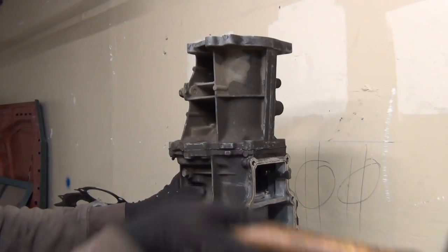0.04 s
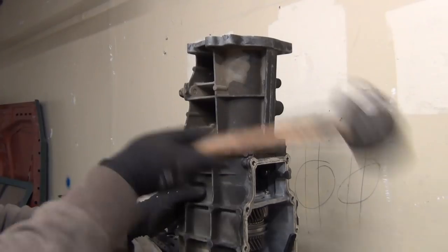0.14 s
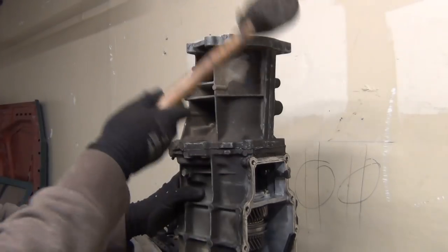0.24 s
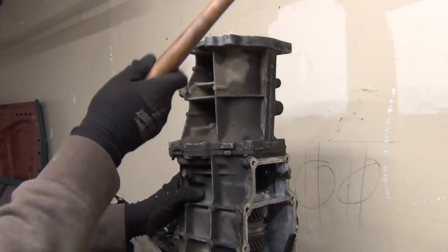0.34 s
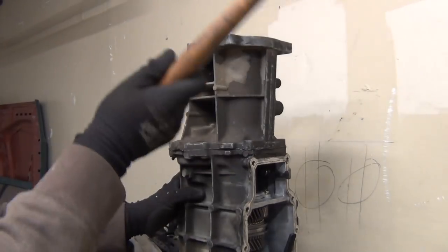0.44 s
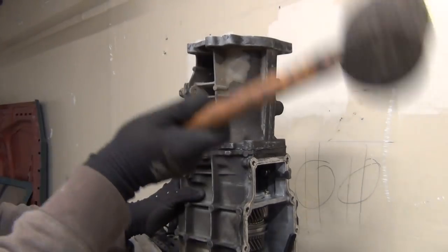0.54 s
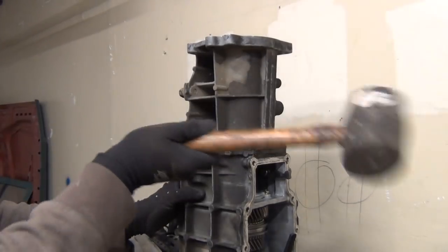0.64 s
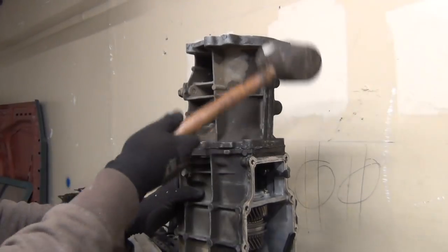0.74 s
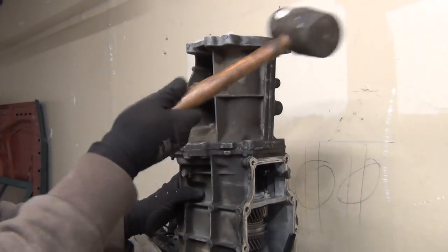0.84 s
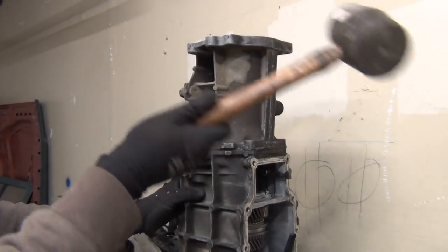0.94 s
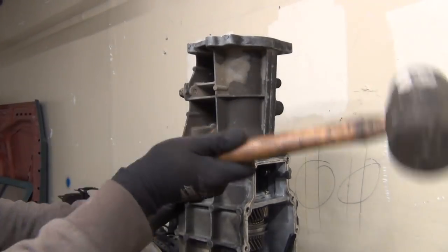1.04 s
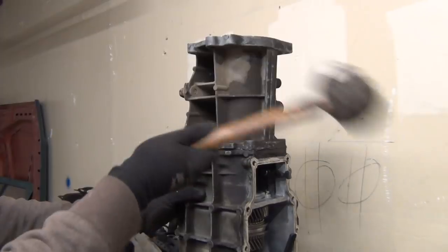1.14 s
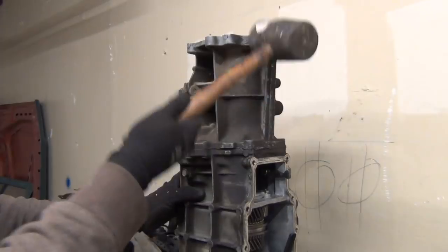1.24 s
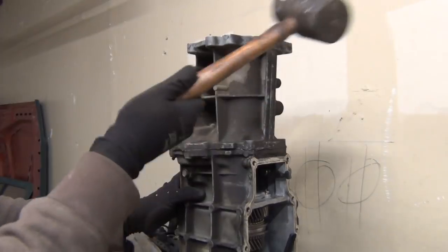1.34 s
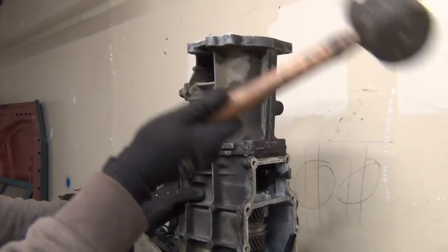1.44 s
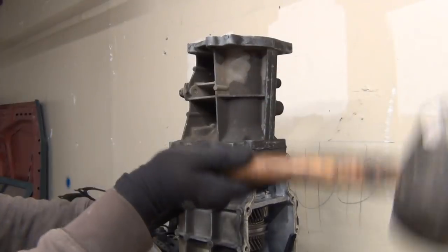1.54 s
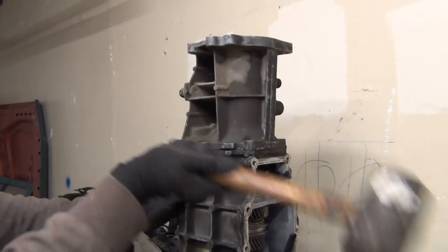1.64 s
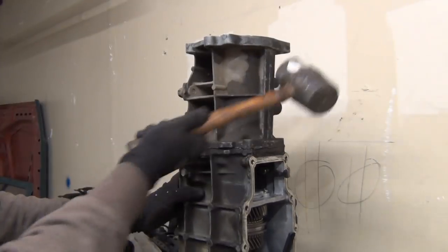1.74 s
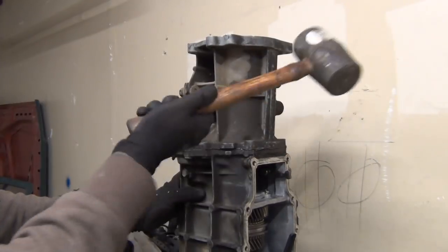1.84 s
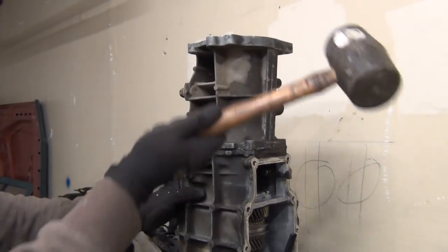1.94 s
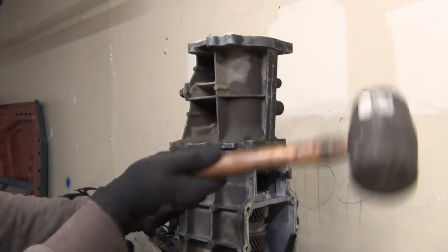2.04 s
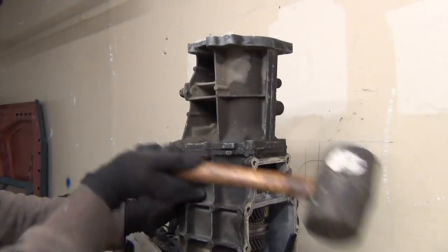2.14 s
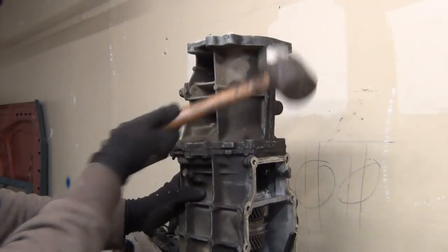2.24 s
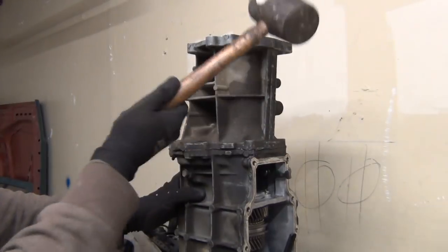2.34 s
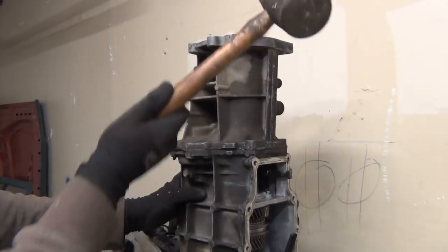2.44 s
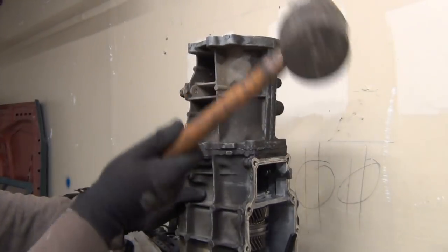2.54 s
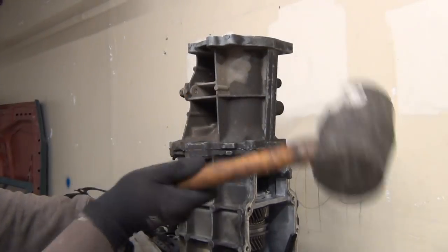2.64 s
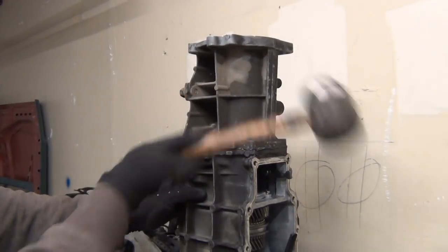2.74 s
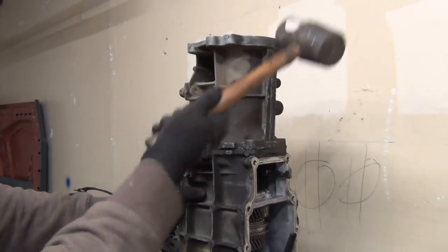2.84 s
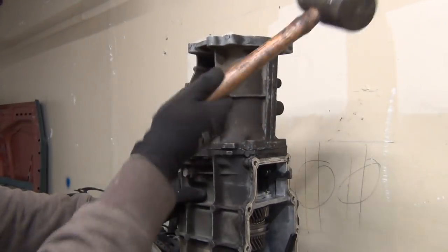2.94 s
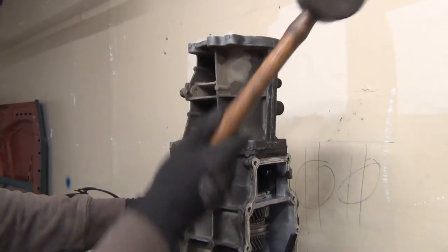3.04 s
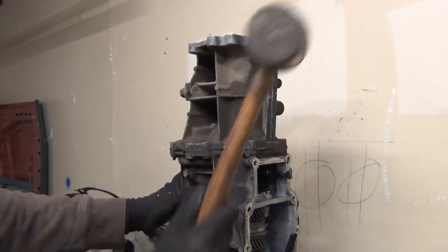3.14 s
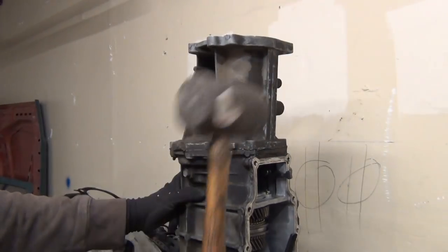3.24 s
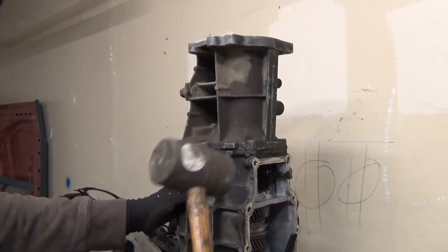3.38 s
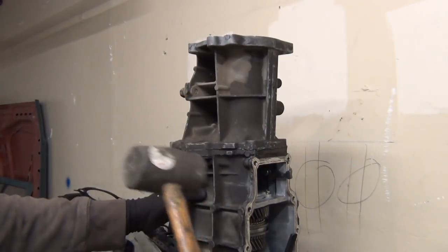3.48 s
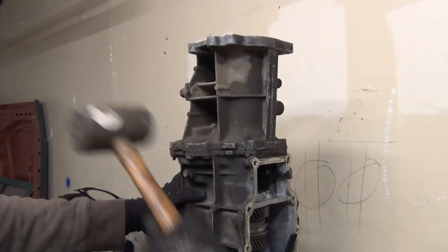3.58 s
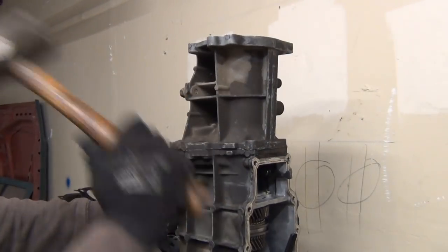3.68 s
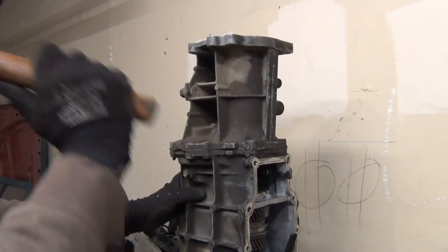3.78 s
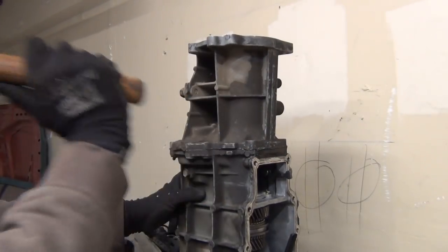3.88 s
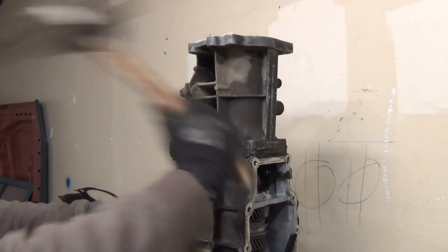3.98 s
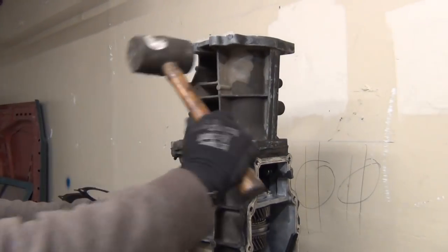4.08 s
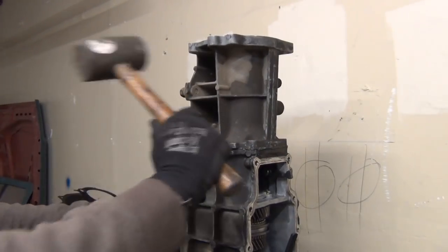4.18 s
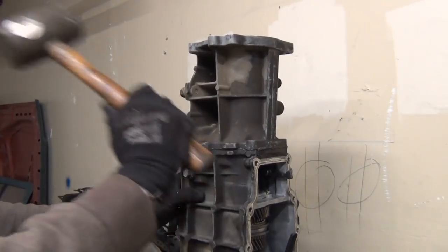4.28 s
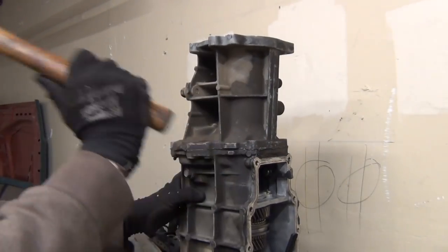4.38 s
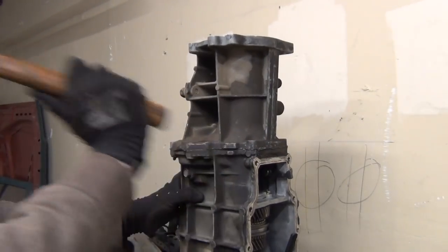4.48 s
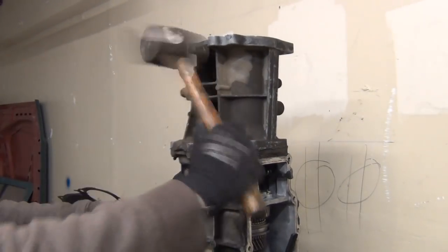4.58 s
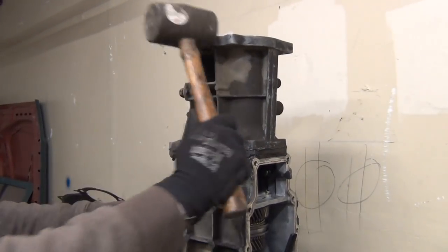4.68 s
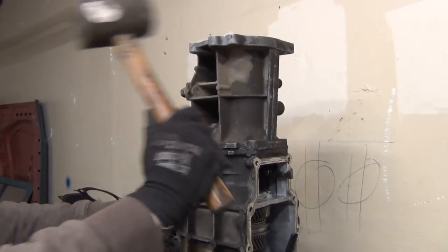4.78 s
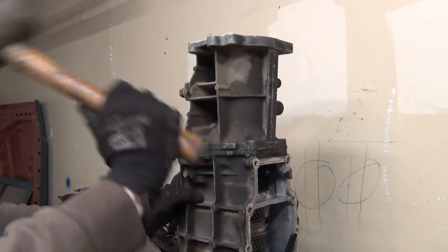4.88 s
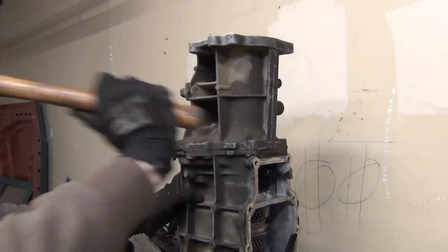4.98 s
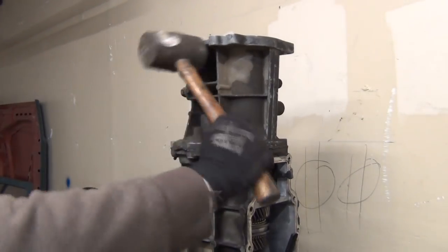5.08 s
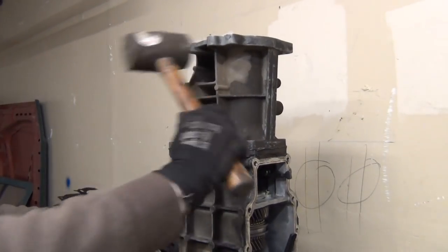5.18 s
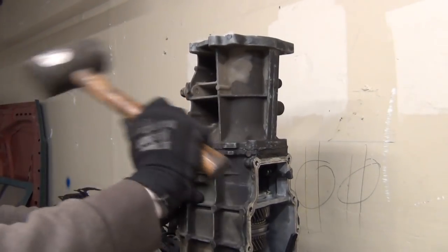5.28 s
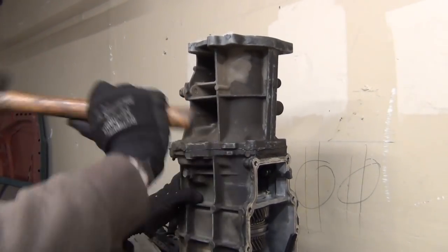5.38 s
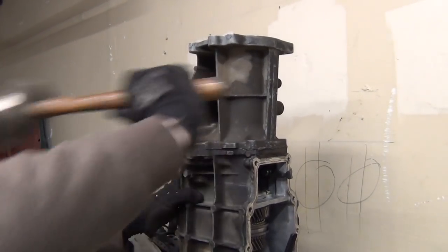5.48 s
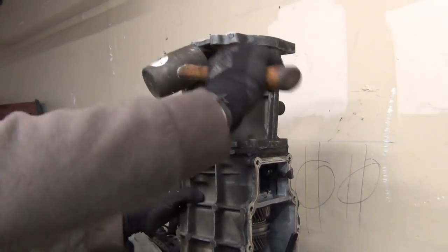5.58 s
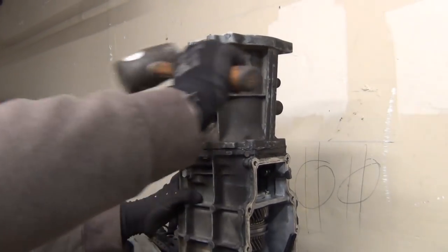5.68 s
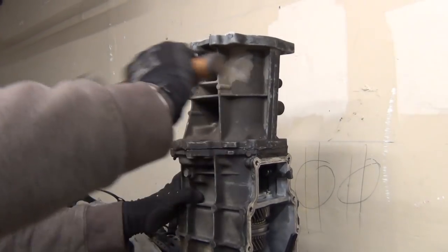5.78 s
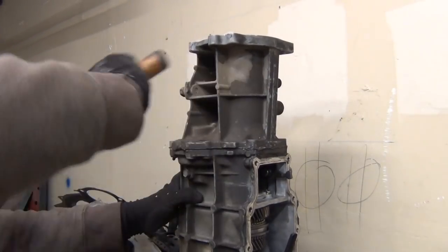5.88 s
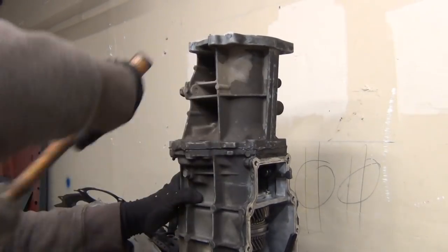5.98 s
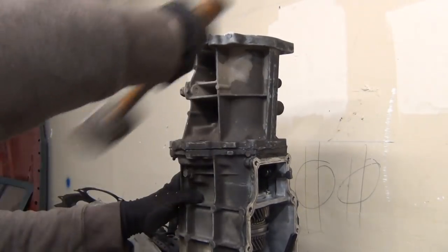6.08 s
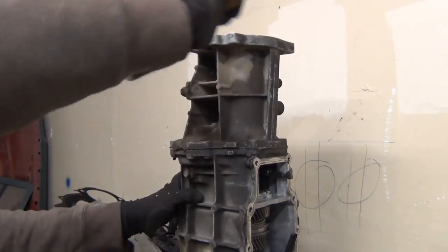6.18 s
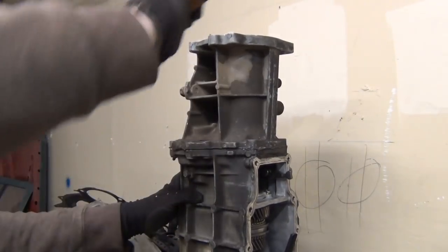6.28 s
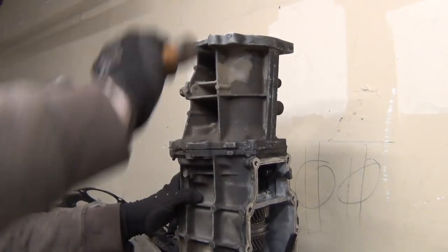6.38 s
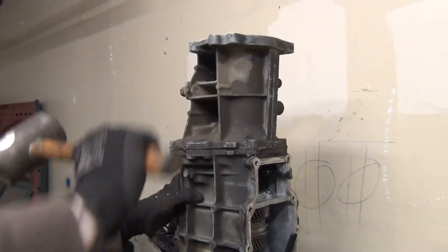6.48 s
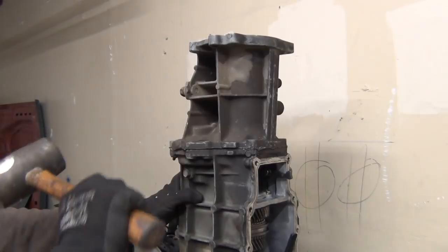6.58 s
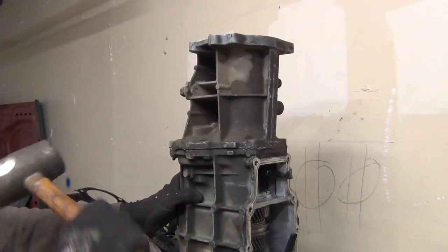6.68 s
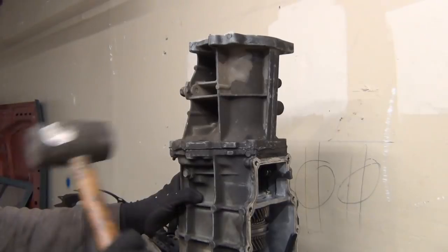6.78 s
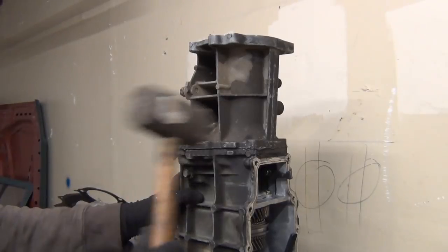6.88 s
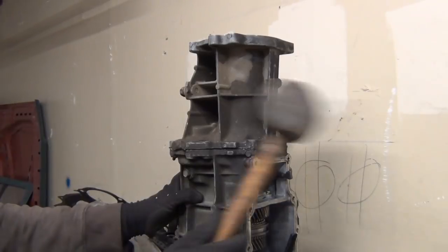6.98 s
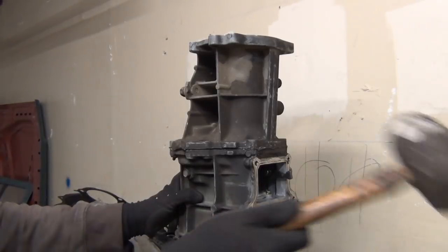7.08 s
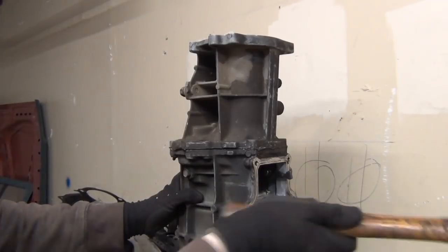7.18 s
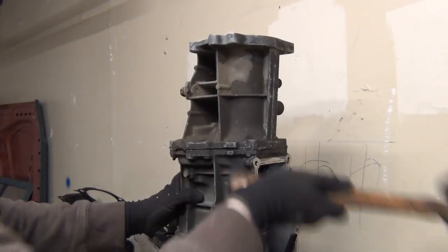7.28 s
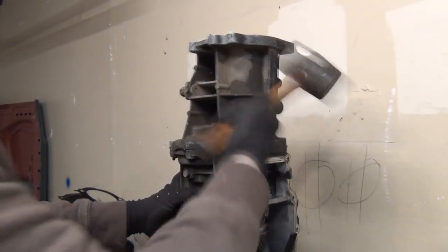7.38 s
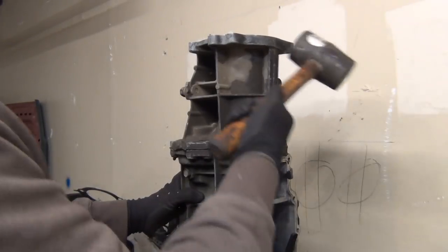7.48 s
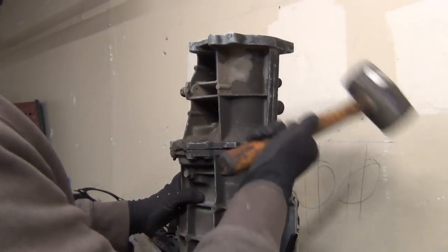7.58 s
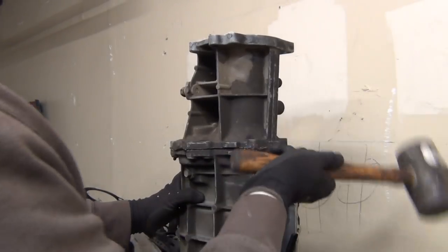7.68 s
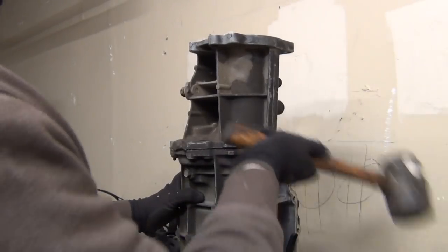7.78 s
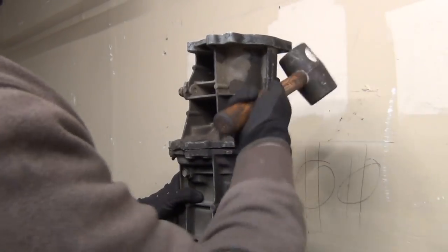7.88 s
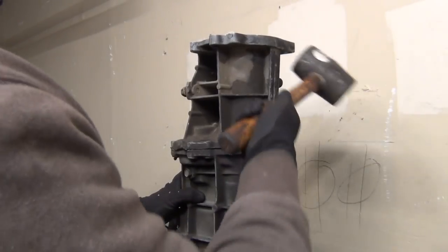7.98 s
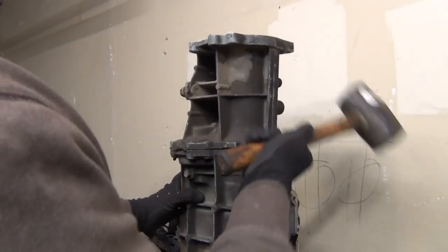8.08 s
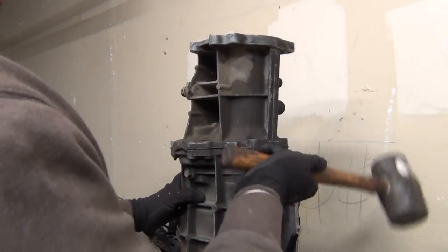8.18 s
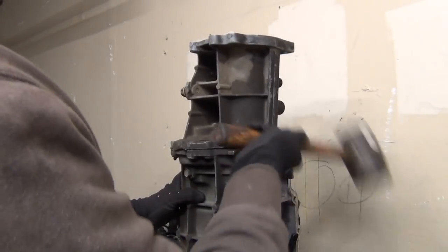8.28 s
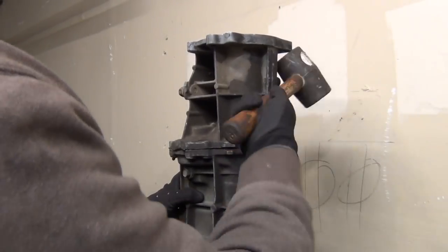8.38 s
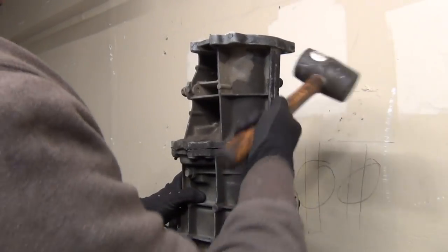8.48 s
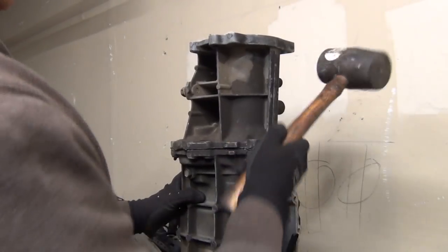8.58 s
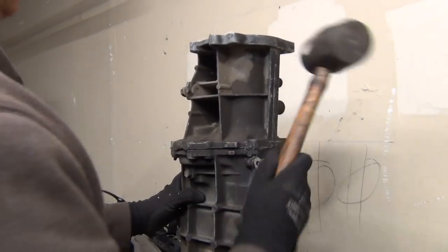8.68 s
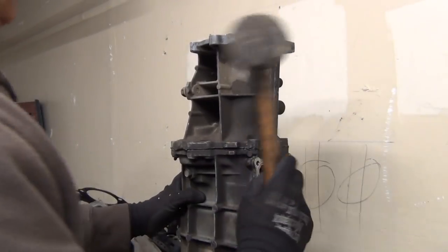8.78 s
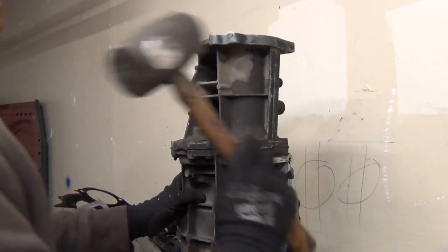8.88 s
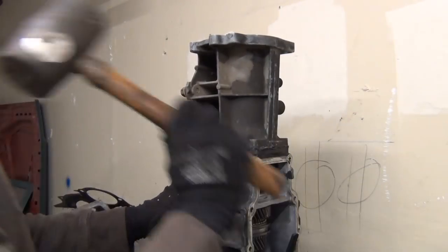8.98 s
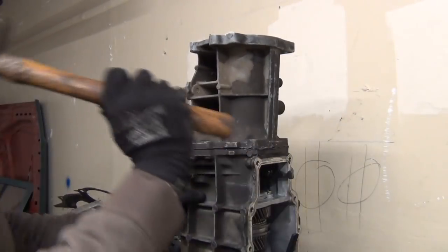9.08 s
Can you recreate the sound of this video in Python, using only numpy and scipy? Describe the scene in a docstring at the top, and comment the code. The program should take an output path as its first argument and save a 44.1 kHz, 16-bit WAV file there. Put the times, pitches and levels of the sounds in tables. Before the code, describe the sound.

A rubber mallet strikes a heavy cast metal housing on a bench, six evenly spaced blows, a pause with soft glove rustle, five more ending with a weaker hit, another pause, then three final blows. Each is a dull hollow thunk with a short damped clang. Loose parts tick and the housing rocks faintly. Close microphone, small live garage, quiet air.

```python
"""Mallet on a metal housing

A rubber mallet lands fourteen blows on six spots of a cast metal housing on a bench in a garage.
Each blow is coloured noise with a bright snap, over decaying sines for the casting and the bench.
Softer copies rock the housing, filtered bursts tick, and swelling noise makes rustle, shuffle and air.
A quick limiter in the camera microphone flattens the peaks; its electronics add a whine of steady sines.
"""
import sys
import numpy as np
from scipy import signal
from scipy.fft import rfft, irfft
from scipy.io import wavfile
from scipy.ndimage import uniform_filter1d, minimum_filter1d

SR = 44100
rng = np.random.default_rng(int(sys.argv[2]) if len(sys.argv) > 2 else 0)


def to_wav(s):
    """Save 16-bit WAV."""
    ch = np.atleast_2d(s).T  # columns
    pcm = np.round(np.clip(ch, -1, 1) * 32767)  # PCM
    wavfile.write(sys.argv[1], SR, pcm.astype(np.int16))


N = 402633

# when the mallet moves to another spot on the housing: (time [s])
MOVE_TIMES = [1.5, 3.5, 4.9, 6.0, 7.0]


def spot_at(s):
    """Number of the spot being struck at time s, counted by the moves so far."""
    return np.searchsorted(MOVE_TIMES, s)


# mallet blows: (time [s], strength [dB], left minus right [dB], rise [s], hardness [dB/octave], snap [dB],
# bench thump [dB], casting ring [dB], pitch of the clang that stands out [Hz], clang [dB])
BLOWS = [(0.264, -10.5, 0.3, 0.0065, -0.5, -5.5, -7.5, -8, 1960, 1),
         (0.782, -10.5, 0.4, .004, -0.5, -9.5, -3, 1, 3100, 2),
         (1.2542, -9.5, 0.3, 0.0031, -0.5, -11.5, -8, -1.5, 3220, 5),
         (1.799, -11, 0.5, 0.0078, 0.56, -0.5, -2, -2, 3090, 7),
         (2.306, -12.5, 0.3, .004, -0.5, -7.5, -6.5, -2, 3180, 2.5),
         (2.854, -8.5, .3, 0.0027, 0, -18, -11, -2, 3100, 4),
         (4.084, -9, 0.3, 0.026, 0.5, -21.5, -10.5, 2.5, 1014, 0.5),
         (4.657, -9.5, -0.1, 0.0062, 1, -3, -9.5, 2, 3170, 5),
         (5.153, -10, 0.6, 0.0029, 0.5, -7, -12.5, -4, 3680, 1),
         (5.631, -13.5, 0, 0.0071, 1, -3, -30.5, 2.5, 3820, 5),
         (6.195, -19.5, 0.3, 0.0025, -1.5, -21, -8, 3, 6200, 7.5),
         (7.464, -10.5, 1, 0.0021, 0.5, -6.5, -5.5, -1, 2350, -1),
         (7.946, -10, 0.2, 0.0067, 0.5, -0.5, -6, -7.5, 2070, 6.5),
         (8.42, -13.5, 0.2, 0.0037, 2, -1, -4.5, 1, 2420, 5)]
# how strongly each spot sets the casting ringing, one list a spot: (pitch [Hz], level [dB])
SPOT_RINGS = [
    [(300, -3.5), (460, -6.5), (1000, 2), (2100, -3.5), (3100, 3.5), (3700, -5), (6300, -7.5)],
    [(300, -7.5), (460, -4.5), (1000, -3.5), (2100, -5), (3100, 2), (3700, -2), (6300, -1)],
    [(300, -2), (460, -8.5), (1000, -1.5), (2100, 0), (3100, -6.5), (3700, -18.5), (6300, -9)],
    [(300, 0), (460, -10), (1000, -11.5), (2100, -5), (3100, 2), (3700, -3), (6300, 3.5)],
    [(300, -7), (460, -7.5), (1000, -7), (2100, -10), (3100, 6), (3700, -10), (6300, -2)],
    [(300, -6), (460, -5.5), (1000, -6), (2100, -0.5), (3100, -13), (3700, -4), (6300, -8)],
]


def mallet():
    """The main blows: each excites the casting modes as strongly as its spot allows."""
    blows = []
    for s, db, pan_db, *how in BLOWS:
        side_db = .5 * pan_db * np.array([[1], [-1]])
        blows.append((s, gain_of(db + side_db) * impact(s, *how, SPOT_RINGS[spot_at(s)])))
    return sum_at(blows)


def impact(s, rise_s, hardness, snap_db, thump_db, ring_db, clang_hz, clang_db, weights):
    """One contact: clatter, snap and the ring of casting and bench, shaped by a rise and a wobble."""
    t = np.arange(SR) / SR
    room = echoes(build_s=0.0007) * np.clip(4 - 4 * t, 0, 1)  # fades out over the last quarter second

    def clang(f):
        """Close modes under the mallet ring harder."""
        width_hz = 164
        return clang_db * np.exp(-((f - clang_hz) / width_hz) ** 2)

    modes = ring(CASTING, lambda f: ring_db + clang(f) + read(weights, f), spread_db=1.5, detune=0.0047)
    modes += ring(BENCH, lambda f: thump_db, spread_db=3.0, detune=0.013)
    modes_in_room = signal.fftconvolve(room, modes[None], axes=1)[:, :SR]
    out = clatter(spot_at(s), room, hardness, clang) + snap(snap_db) + gain_of(-43.5) * modes_in_room
    add(out, 0, gain_of(-1.5) * modes)

    # the bass blooms more slowly than the rest
    bass = signal.sosfilt(signal.butter(N=1, Wn=358, fs=SR, output="sos"), out)
    out = out - bass * np.exp(-t / 0.012)
    # the housing shakes on the bench
    wobble_db = 1.7 * wander(SR, grain=0.027 * SR) * np.minimum(t / 0.32, 1)
    rise = np.minimum(t / max(rise_s, .001), 1) ** 0.79
    return out * gain_of(wobble_db) * rise


# colour of a blow, one list a spot: (pitch [Hz], relative level [dB])
FACES = [
    [(29, -31), (50, -24), (80, -27.5), (160, -17), (197, -13.5), (322, -9.5), (467, -3.5), (524, -8.5),
     (835, -20), (1210, -17), (1840, -21.5), (8160, -45.5), (13000, -56.5)],
    [(29, -26.5), (50, -25.5), (156, -9), (232, -8.5), (286, 0), (361, -3.5), (425, -4), (693, -15),
     (960, -13), (1390, -20), (2600, -27.5), (3000, -29), (4060, -36), (13000, -54.5)],
    [(29, -45), (50, -37.5), (85, -3), (168, -8.5), (193, -8.5), (249, -4), (397, -4), (467, -4),
     (512, -6.5), (875, -11), (1760, -19.5), (3140, -27), (13000, -50.5)],
    [(29, -51.5), (50, -22), (232, -11.5), (293, 1.5), (337, -6.5), (456, -9), (562, -14), (895, -20),
     (2800, -33.5), (3620, -36.5), (4360, -44.5), (6320, -46), (13000, -62)],
    [(29, -49), (50, -23), (85, -18.5), (188, -18.5), (267, -10.5), (353, -13), (456, -6), (524, -14.5),
     (617, -14), (816, -24), (895, -14.5), (3620, -28), (13000, -51)],
    [(29, -54), (50, -17), (76, -19), (300, 2.5), (378, -5.5), (467, 0), (537, -7), (662, -12),
     (1080, -18.5), (1880, -21.5), (2800, -28), (3450, -29), (13000, -50)],
]


def clatter(spot, room, hardness, clang):
    """Dull dense noise in the colour of the struck face; countless small modes make it uneven."""
    def colour_db(f):
        uneven_db = 1.9 * np.clip(f / 1500, 0, 1) * wander(len(f), grain=61)
        tilt_db = hardness * np.log2((f + 1) / 500)
        return read(FACES[spot], f) + clang(f) + tilt_db + uneven_db

    lead = np.zeros((2, 2048))  # room for the filter to settle
    sound = coloured(np.hstack([lead, room]), colour_db)[:, 2048:]
    return sound / np.sqrt(np.mean(sound[:, :SR // 20] ** 2))  # rms 1 over the first 50 ms


def snap(db):
    """The bright crack of contact: noise around 2.5 kHz that falls 60 dB in 24 ms."""
    t = np.arange(SR) / SR
    return gain_of(db - 60 * t / 0.024) * noise(SR, lambda f: -4. * abs(np.log2((f + 1) / 2500)), SAME)


# modes of the casting, decay capped in ring(): (pitch [Hz], level [dB], 60 dB decay [s])
CASTING = [(297, -2, .18), (303.5, 0.5, 0.15), (343, 1, 0.22), (344.6, -10, 0.12), (467.4, -12.5, 0.26),
           (462.2, 6.5, 0.45), (485.6, 3.5, 0.074), (648, -15, 0.21), (638.3, -4, 0.28), (770, -3.5, 0.11),
           (928, -5, 0.14), (1169, -14, 0.4), (1260, -9.5, 0.17), (1480, -11.5, 0.2), (1867, -11.5, 0.22),
           (2040, -24, 0.23), (2366, -27.5, 0.26), (2490, -16.5, .14), (2945, -20.5, 0.17),
           (3244, -25, 0.227), (3520, -19.5, .18), (3670, -18, 0.18), (4450, -41.5, 0.081),
           (4600, -26, 0.29), (5000, -48, 0.16), (5350, -31, .15), (6305, -28.5, 0.25)]
# modes of the bench, decay capped in ring(): (pitch [Hz], level [dB], 60 dB decay [s])
BENCH = [(93.9, -3, 0.49), (143, -19.5, 0.075), (155.5, 15, 0.11), (213.4, -2.5, 0.17)]


def ring(modes, colour_db, spread_db, detune):
    """Decaying sines; each blow lands a little elsewhere, so levels and pitches vary by chance."""
    hz, db, t60 = np.transpose(modes)[..., None]
    t60 = np.minimum(t60, .3)  # gasket and gloves damp every ring
    level_chance, pitch_chance = rng.standard_normal((2, len(modes), 1))
    t = np.arange(SR // 2) / SR
    level_db = db + colour_db(hz) + spread_db * level_chance - 60 * t / t60
    sines = np.sin(2 * np.pi * hz * (1 + detune * pitch_chance) * t)
    return (gain_of(level_db) * sines).sum(0)


# decay of the garage: (pitch [Hz], 60 dB decay [s])
GARAGE = [(60, 0.62), (160, 0.54), (420, 0.49), (650, 0.52), (1100, 0.55), (2200, 0.52), (3700, 0.51),
          (4300, 0.42), (7700, 0.46), (15000, 0.24)]
# likeness of left and right: (pitch [Hz], likeness [0 to 1])
SAME = [(30, .5), (60, .93), (200, .99), (330, .995), (550, .94), (1000, .96), (2000, .96), (4000, .9),
        (8000, .86), (12000, .99)]


def echoes(build_s):
    """Dense garage reflections: noise of rms 1 that builds up quickly, each band dying at its own speed."""
    hz, t, bands = signal.stft(noise(SR, lambda f: 0 * f, SAME), SR, nperseg=256)
    decay = gain_of(-60 * t / read(GARAGE, hz)[:, None])
    tail = signal.istft(bands * decay, SR, nperseg=256)[1][:, :SR]
    return tail * (1 - np.exp(-np.arange(SR) / SR / build_s))


# the housing rocks back on the bench: (time [s], level [dB], hardness [dB/octave])
KNOCKS = [(0.232, -45, 1), (0.529, -58, -12), (1.001, -46.5, 1), (1.495, -55.5, 2.5), (2.099, -50, -0.5),
          (2.5, -40, -0.5), (2.737, -49.5, -4), (4.279, -44, -16), (4.453, -44.5, -2.5), (4.879, -49, 2.5),
          (5.056, -43.5, -0.5), (5.367, -29, -12.5), (5.429, -44.5, 2.5), (5.579, -46, 1),
          (5.817, -39, -13), (5.891, -46.5, 2.5), (6.054, -47.5, -5), (6.516, -45.5, -4.5),
          (6.599, -49.5, -3.5), (6.757, -52, -5), (7.066, -53, 1), (7.674, -31, 1), (8.642, -32.5, -2),
          (8.92, -52, -6), (8.987, -49, -6)]
# how strongly rocking sets the casting ringing: (pitch [Hz], level [dB])
ROCKING_RING = [(300, -23.5), (460, -20.5), (1000, -30.5), (2100, -9.5), (3100, -16), (3700, -24),
                (6300, -13.5)]


def rocking():
    """Soft knocks excite the same casting and bench, but damped: they die sooner."""
    damping = gain_of(-60 * np.arange(SR) / SR / 1.8)
    knocks = []
    for s, db, hardness in KNOCKS:
        knock = impact(s, rise_s=.003, hardness=hardness, snap_db=-21, thump_db=-11.5, ring_db=0,
                       clang_hz=0, clang_db=0, weights=ROCKING_RING)
        knocks.append((s, gain_of(db) * damping * knock))
    return sum_at(knocks)


# loose parts tick, and at 6.21 s the mallet strikes a second time: (time [s], level [dB], centre pitch [Hz], #
# width [octaves], 60 dB decay [s], casting ring relative to the tick [dB])
TICKS = [(0.0532, -45, 4500, 1.8, 0.018, -12.5), (0.375, -32, 5030, 1.06, 0.034, -15),
         (1.6761, -59, 4470, 2, 0.026, -50), (1.8522, -47, 4020, 1.7, 0.0079, -7),
         (2.0114, -46, 5000, 0.93, 0.016, -8), (2.398, -44, 5000, 1.1, 0.025, -16),
         (2.5381, -52, 3500, 1.5, .035, -2), (2.6604, -55, 2480, 0.42, 0.024, -20),
         (2.7387, -72, 2200, 1.5, .03, -22), (2.9688, -42.5, 6040, 0.75, 0.032, -11),
         (4.5082, -58, 3500, 1.8, .03, -30), (5.102, -53, 2470, 0.69, 0.027, -15),
         (5.4298, -44, 2830, 1.54, 0.017, 1.5), (5.8142, -43.5, 7700, 0.24, 0.02, -33),
         (5.8948, -39, 2000, 1, 0.014, -8), (6.1205, -46, 7540, 0.31, 0.011, -30),
         (6.2087, -22, 2400, 1.8, 0.03, -2), (6.519, -48, 2460, 0.55, 0.029, -27),
         (6.6348, -56, 7940, 0.5, .02, -30), (6.8613, -39, 7200, 0.26, 0.0099, -35),
         (7.5894, -41, 10700, 1.2, .04, -35), (7.644, -29, 5600, 1.23, 0.035, -13),
         (7.7276, -34, 5500, 1.04, 0.024, -13), (8.13, -43.5, 6800, 0.73, 0.018, -23),
         (8.193, -41.5, 6960, 1.7, 0.016, -16), (9.078, -50, 5500, 2.8, .025, -15)]


def ticks():
    """Loose parts click at their own times and pitches; the row at 6.21 s is a second strike of the mallet."""
    return sum_at([(s, tick(*how)) for s, *how in TICKS])


def tick(db, hz, octaves, t60, ring_db):
    """A brief noise burst around a centre pitch with a faint echo, plus ringing ribs of the casting."""
    t = np.arange(SR // 2) / SR

    def bell(f):
        return np.maximum(-3 * (2 * np.log2((f + 1) / hz) / max(octaves, .1)) ** 2, -80)

    decay_and_echo = gain_of(-60 * t / t60) + gain_of(-21 - 60 * t / 0.37)
    burst = noise(len(t), bell, SAME) * decay_and_echo
    ribs = ring(CASTING, bell, spread_db=2.5, detune=0.0028) * gain_of(-60 * t / 0.42)  # still held, so damped
    ribs = ribs / np.sqrt(np.mean(ribs[:SR // 100] ** 2))  # rms 1 over the first 10 ms
    return gain_of(db) * (burst + gain_of(ring_db) * ribs)


# cloth and gloves slide: (start [s], length [s], level [dB])
RUSTLES = [(3.24, 0.2, -53), (3.39, 0.16, -57.5), (3.7, 0.14, -61), (6.625, 0.24, -66), (6.88, 0.21, -60.5),
           (7.01, 0.11, -56), (7.26, 0.4, -63.5), (8.77, 0.26, -58.5)]
# colour of cloth: (pitch [Hz], relative level [dB])
CLOTH = [(880, -51), (1500, 11), (1760, -25), (1960, 4), (3380, 8.5), (4000, 3.5), (8490, 8.5), (16000, -5)]


def rustle():
    """Sliding gloves and sleeves: bright noise that starts fast, fades slowly and flutters finely."""
    return moving(RUSTLES, CLOTH, rise=0.11, fall=0.56, flutter_db=1.5, flutter_s=0.0065)


# low shuffling: (start [s], length [s], level [dB])
SHUFFLES = [(-.1, 0.5, -53.5), (3.25, 0.29, -56.5), (6.45, 0.5, -66.5), (7.18, 0.22, -47.5),
            (8.76, 0.41, -48)]
# colour of the rumble: (pitch [Hz], relative level [dB])
RUMBLE = [(24, -32), (40, 18), (97, -6), (445, -6.5), (890, -14.5), (961, -16), (1170, -15), (4000, -29.5),
          (5200, -65), (8800, -120)]


def shuffle():
    """A low rumble in short stretches, with a coarser flutter."""
    return moving(SHUFFLES, RUMBLE, rise=0.23, fall=0.17, flutter_db=3.0, flutter_s=.03)


def moving(rows, colour, rise, fall, flutter_db, flutter_s):
    """Noise that swells, holds, fades and flutters; rise and fall are shares of each length."""
    t = np.arange(N) / SR
    level = np.zeros(N)
    for s, length, db in rows:
        ramp = np.minimum((t - s) / rise, (s + length - t) / fall) / length
        level += gain_of(db) * np.clip(ramp, 0, 1) ** 2
    flutter = gain_of(flutter_db * wander(N, flutter_s * SR))
    return level * flutter * noise(N, lambda f: read(colour, f), SAME)


# colour of the quiet garage: (pitch [Hz], relative level [dB])
AIR = [(15, -59), (25, 7.5), (191, -7), (709, -12), (879, -3.5), (1030, -14), (1150, -3.5), (1310, -10.5),
       (1960, -12.5), (2370, -16.5), (3090, -17.5), (5420, -22), (15000, -25)]
# likeness of left and right in the air: (pitch [Hz], likeness [0 to 1])
SAME_AIR = [(60, .5), (240, 0.46), (950, 0.97), (3800, 1), (12000, 0.24)]


def garage_air():
    """The quiet bed: steady coloured noise, its left-right likeness set by band."""
    return gain_of(-59.5) * noise(N, lambda f: read(AIR, f), SAME_AIR)


# whine of the electronics: (pitch [Hz], level [dB rms])
WHINE = [(15735, -77), (15676, -90), (15617, -93)]


def whine():
    """Thin steady sines from the microphone electronics."""
    t = np.arange(N) / SR
    return sum(np.sqrt(2) * gain_of(db) * np.sin(2 * np.pi * hz * t) for hz, db in WHINE)


def gain_of(db):
    """Decibels to a factor."""
    return 10 ** (np.asarray(db) / 20)


def evened(x):
    """Scales to rms 1."""
    return x / np.sqrt(np.mean(x ** 2) + 1e-20)


def read(points, hz):
    """Looks a table up on a log-frequency axis."""
    f, value = np.transpose(points)
    return np.interp(np.log(hz + 1), np.log(f + 1), value)


def add(mix, s, sound):
    """Mixes a sound in at time s, cut at the end of the mix."""
    part = mix[..., round(s * SR):][..., :sound.shape[-1]]
    part += sound[..., :part.shape[-1]]


def sum_at(sounds):
    """Mixes (time, sound) pairs."""
    out = np.zeros((2, N))
    for s, sound in sounds:
        add(out, s, sound)
    return out


def coloured(x, db_of_hz):
    """Filters x by a level rule over frequency."""
    size = x.shape[-1]
    return irfft(rfft(x) * gain_of(db_of_hz(np.fft.rfftfreq(size, 1 / SR))), size)


def noise(size, db_of_hz, same):
    """Two channels of coloured noise of rms 1, as alike in each band as the table same says."""
    left, other = rfft(rng.standard_normal((2, size)))
    likeness = np.clip(read(same, np.fft.rfftfreq(size, 1 / SR)), 0, 1)
    right = likeness * left + np.sqrt(1 - likeness ** 2) * other
    return evened(coloured(irfft([left, right], size), db_of_hz))


def wander(size, grain):
    """Smooth chance of rms 1 that changes over grain steps."""
    width = max(round(grain), 1)
    return evened(uniform_filter1d(uniform_filter1d(rng.standard_normal(size), width), width))


def scene():
    """All sources over the quiet air of the garage."""
    return mallet() + rocking() + ticks() + rustle() + shuffle() + garage_air()


# balance of the microphone pair: (pitch [Hz], left minus right [dB])
LEAN = [(30, 3.5), (60, 2.5), (125, -.4), (500, -1.2), (4000, -1), (12000, -.3)]
# treble response of the microphones: (pitch [Hz], level [dB])
CAPSULE = [(11000, -3.5), (13500, -5), (16000, -24.5)]


def record(dry):
    """Two microphones lean by band and lose bass; a limiter holds the peaks; then whine and band limit."""
    left = coloured(dry[0], lambda f: .5 * read(LEAN, f))
    right = coloured(dry[1], lambda f: -.5 * read(LEAN, f))
    pair = coloured(np.array([left, right]), lambda f: read(CAPSULE, f))
    bass_cut = signal.butter(N=4, Wn=62, btype="high", fs=SR, output="sos")
    pair = signal.sosfilt(bass_cut, pair)

    threshold_db, recovery_db_per_s = -10.5, 660.0
    peak = -minimum_filter1d(-abs(pair).max(0), size=129)  # running maximum of the louder side
    peak_db = 20 * np.log10(peak + 1e-9)
    fall = np.arange(N) * recovery_db_per_s / SR
    envelope_db = np.maximum.accumulate(peak_db + fall) - fall  # jumps up at once, falls steadily
    over_db = np.maximum(envelope_db - threshold_db, 0)
    held = pair / gain_of(0.95 * uniform_filter1d(over_db, size=201))  # takes off 95 % of the excess dB

    band_limit = signal.firwin(511, 16400, window=("kaiser", 9), fs=SR)  # low-pass [Hz]
    return signal.oaconvolve(held + whine(), band_limit[None], "same")


dry = scene()
out = record(dry)
to_wav(out)
```